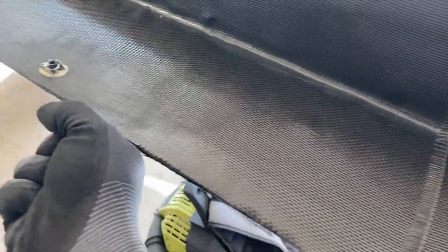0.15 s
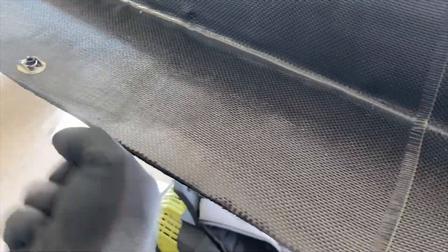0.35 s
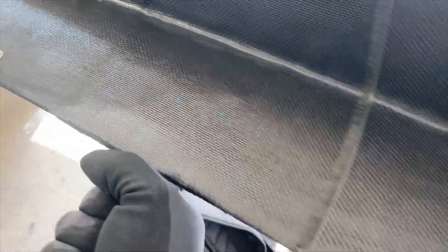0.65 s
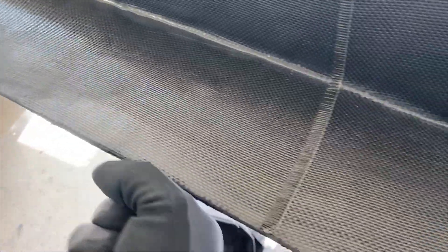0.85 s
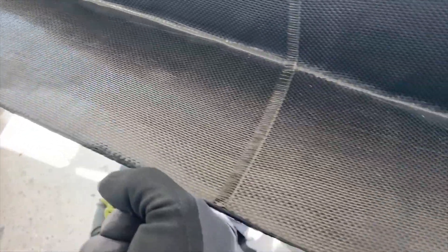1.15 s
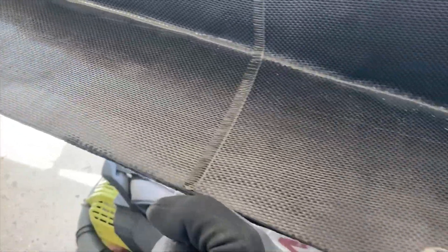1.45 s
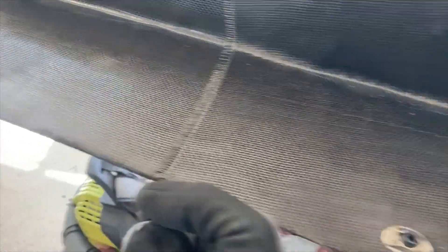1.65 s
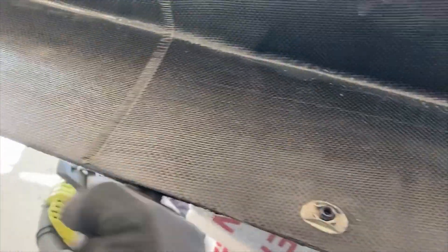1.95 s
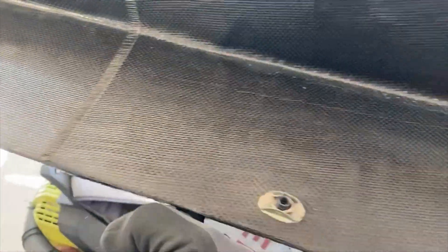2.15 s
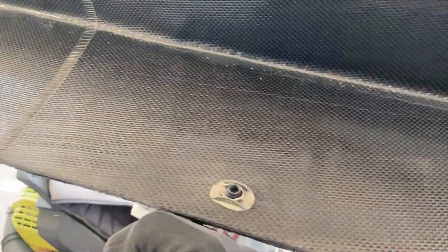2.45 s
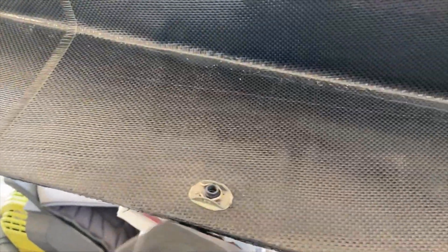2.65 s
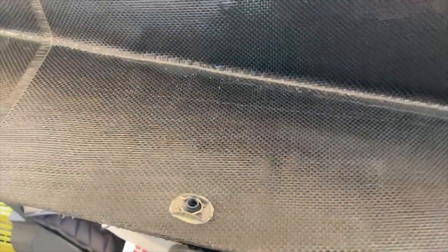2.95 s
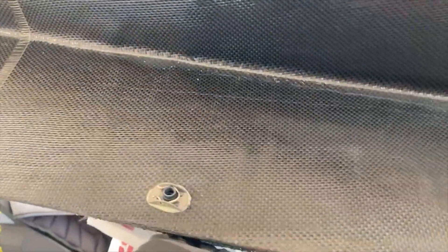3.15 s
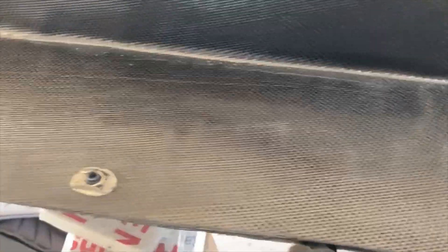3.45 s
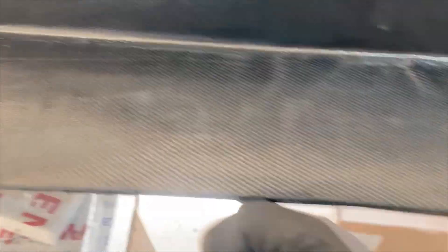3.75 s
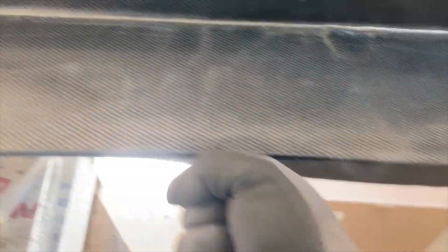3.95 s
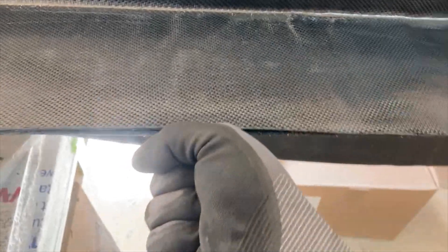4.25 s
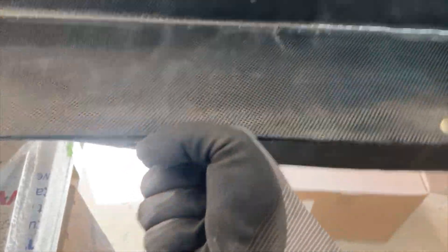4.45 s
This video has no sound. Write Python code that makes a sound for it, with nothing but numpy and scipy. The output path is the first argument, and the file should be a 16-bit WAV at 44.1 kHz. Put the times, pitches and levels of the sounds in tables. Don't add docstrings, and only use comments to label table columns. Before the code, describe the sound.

Close to the microphone, a bonded composite laminate parts in uneven bursts: dry bright snaps with woody knocks, thin fibre ticks, brief plate ringing and a low bending groan under each heavy pull. Quiet gaps between pulls expose a faint room hum. The densest, loudest crackling comes around two thirds through, in a mildly reverberant workshop.

```python
import sys
import numpy as np
from scipy import signal
from scipy.fft import rfft, irfft, next_fast_len
from scipy.io import wavfile

SR = 44100
rng = np.random.default_rng(int(sys.argv[2]) if len(sys.argv) > 2 else 0)


def unload_audio(sound):
    columns = np.transpose(np.atleast_2d(sound))
    steps = np.round(np.clip(columns, -1, 1) * 32767)
    wavfile.write(sys.argv[1], SR, steps.astype(np.int16))


def magnitude_from_level(level_db):
    exponent = np.asarray(level_db, float) / 20
    return 10 ** exponent


N = 202181

# [f/Hz, width/Hz, level/dB]
SNAP_MODES = [(8550, 2770, 1.5), (10010, 1600, -1), (12000, 2700, -4.5), (15400, 670, -18.5)]
# [f/Hz, width/Hz, level/dB]
KNOCK_MODES = [(2925, 278, -9.5), (3800, 1320, -1.5), (4770, 5600, -36), (6020, 710, -3)]
# [f/Hz, width/Hz, level/dB]
PLATE_MODES = [(477.5, 60.5, -6), (631, 84, -16.5), (735, 65, -12.5), (885, 56, -9), (1095, 233, -3),
               (1630, 266, 1.5), (1940, 200, -3), (2750, 520, -1)]
# [f/Hz, width/Hz, level/dB]
RIM_MODES = [(1282.7, 61.4, -3.5), (1394, 200, -5.5)]
# [t/s, snap peak level/dB, then knock, plate ring, rim note: dB re snap]
LONE_CRACKS = [(0.3642, -25.5, -17, 1, -5.5), (0.4186, -21, -3.5, -7, -38), (0.494, -15, -2.5, -1.5, -6),
               (0.6278, -28, -2.5, -6, -8), (0.7446, -22, -5.5, -4.5, -5.5), (0.8334, -14, -0.5, 2.5, -15),
               (1.236, -17.5, 0, -2, -13.5), (1.4254, -16.5, -4.5, -10.5, -8.5),
               (1.436, -17, -31, -4.5, -12), (2.293, -14.5, 5, -5, 4), (2.759, -8.5, -12, -5.5, -17.5),
               (2.7617, -8, -10, -4, -12), (2.909, -11.5, -26, -6, -23), (2.9117, -12, -4, -12, -44),
               (3.9128, -25.5, -13, -8, 7), (4.0136, -17.5, -14, -15, -17.5),
               (4.4208, -12.5, -6.5, -14.5, -12.5)]
# [full tear t/s, hold/s, tearing level/dB, depth/dB (heavy pulls creak low), rim rub/dB re tear]
HAND_PULLS = [(0.01, 0.049, -36, -8, -12), (0.239, 0.24, -35.5, -2, -34), (0.52, 0.15, -41, -1.5, -14),
              (0.738, 0.0081, -31, -0.5, -2), (0.887, 0.021, -35.5, -3.7, -13),
              (1.001, 0.05, -38.5, 1.2, 2), (1.112, 0.18, -43, -7, 2), (1.268, 0.047, -37, -1.5, 3),
              (1.96, 0.043, -29.5, -2.5, 2), (2.056, 0.024, -60, 22.5, -9), (2.244, 0.019, -45, 7, -15),
              (2.31, 0.041, -38, 8.5, -21), (2.499, 0.17, -52, 3.5, -15), (2.625, 0.03, -43, -4.5, -14),
              (2.666, 0.033, -31, 4.5, -2), (3.217, 0.13, -25, -2.5, 3.5), (3.619, 0.043, -32.5, 7.8, -2),
              (3.884, 0.029, -31.5, 6.5, -3), (4.03, 0.03, -52.5, 13, 3), (4.143, 0.146, -49, 0.5, -9),
              (4.318, 0.083, -46.5, 2.5, -1)]


def cracks():
    # [t/s, snap peak level/dB]
    crack_runs = [(0.0325, -25), (0.052, -27.5), (0.3519, -27.5), (0.412, -26), (0.8687, -25),
                  (1.0196, -40), (1.0435, -38), (1.0513, -30), (1.061, -32), (1.9841, -28), (2.0026, -20),
                  (2.0121, -14), (2.0662, -28), (2.367, -33), (2.4836, -30.5), (2.9614, -28), (3.2421, -32),
                  (3.32, -12.5), (3.3475, -28), (3.3277, -7.5), (3.3408, -11.5), (3.3612, -6.5),
                  (3.3685, -12.5), (3.3987, -12.5), (3.6474, -15), (3.6598, -11.5), (3.6712, -16),
                  (3.9456, -31.5)]
    # [t/s, snap peak level/dB]
    fibre_ticks = [(0.075, -46), (0.241, -34), (0.2527, -31.5), (0.7632, -32), (1.9309, -38), (1.9414, -34),
                   (1.9913, -25), (2.1525, -46), (2.343, -27), (2.64, -43), (2.6464, -45), (2.651, -40),
                   (2.6915, -30), (2.7097, -27), (2.7262, -26), (2.7347, -28), (2.7495, -33),
                   (3.0906, -31.5), (3.1034, -28.5), (3.2094, -30), (3.2185, -32), (3.225, -35),
                   (3.2348, -21.5), (3.2847, -28), (3.4876, -34), (3.9941, -37), (3.9992, -30),
                   (4.036, -43), (4.553, -40.5)]
    # [t/s, snap peak level/dB]
    flange_slips = [(0.1076, -52.5), (0.6505, -49), (0.9903, -40), (1.1172, -54.5), (1.9537, -36),
                    (1.9786, -38), (2.2445, -47), (2.2846, -41.5), (2.6626, -53), (2.7002, -42),
                    (3.1919, -70), (3.201, -60), (3.6278, -38), (3.8846, -36.5), (3.8913, -55)]
    # knock, plate ring, rim note (dB re snap)
    kinds = [(crack_runs, (-3.5, -22, -13.5)),
             (fibre_ticks, (-14.5, -19.5, -46)),
             (flange_slips, (0, 1.5, 8))]
    events = list(LONE_CRACKS)
    for rows, colour in kinds:
        events += [(*row, *colour) for row in rows]
    s, snap_db, knock_db, ring_db, rim_db = np.transpose(events)
    at = np.round(s * SR).astype(int)
    dulling = -.6 * np.clip(knock_db + 4, -15, 8)
    snap = strike(at, snap_db + 5.5, SNAP_MODES, rise_s=.0005, tear_s=.001, spread_db=1.2, tilt_db=dulling)
    knock = strike(at, snap_db + knock_db + 2.5, KNOCK_MODES, rise_s=.0005, tear_s=.0014, spread_db=2.5)
    ring = strike(at + 20, snap_db + ring_db - 7.5, PLATE_MODES, rise_s=.000079, tear_s=.0025, spread_db=.5)
    rim = strike(at + 30, snap_db + rim_db + 1, RIM_MODES, rise_s=.001, tear_s=.0033, spread_db=2.5)
    return pair(snap, .3) + pair(knock, .6) + pair(ring, .5) + pair(rim, .15)


def strike(at, level_db, modes, rise_s, tear_s, spread_db, tilt_db=0):
    length, lead = 640, 128
    t = (np.arange(length) - lead) / SR
    shape = np.where(t < 0, np.exp(t / rise_s), np.exp(-t / tear_s) + .22 * np.exp(-t / .0075))
    shape += 1.2 * np.exp(-np.abs(t) / .00015)
    bins_hz = np.fft.rfftfreq(length, 1 / SR)
    place = at[:, None] + np.arange(length) - lead
    out = np.zeros((2, N))
    for hz, width, mode_db in modes:
        tear = rng.standard_normal((len(at), 2, length)) * shape
        near = 1 / (1 + (2 * (bins_hz - hz) / (width + 70)) ** 2)
        felt = (np.abs(rfft(tear)) ** 2 * near).sum(axis=2, keepdims=True) / near.sum()
        chance_db = spread_db * rng.standard_normal(len(at))
        gain_db = level_db + mode_db + tilt_db * np.log2(hz / modes[1][0]) + chance_db
        tear *= magnitude_from_level(gain_db)[:, None, None] / np.sqrt(felt)
        force = np.zeros((2, N))
        np.add.at(force, (slice(None), place), tear.transpose(1, 0, 2))
        out += resonate(force, hz, width)
    return out


def peel():
    # [f/Hz, width/Hz, level/dB]
    deep_modes = [(218.3, 105.4, 1.5), (316, 64.3, -2.5), (379, 87, -1)]
    _, snap_db, knock_db, ring_db, rim_db = np.transpose(LONE_CRACKS)
    *_, depth_db, rub_db = np.transpose(HAND_PULLS)

    crackle = tearing(-depth_db, 187, -69, snap_db - 22.5 + .59 * knock_db)
    creak = tearing(0, 116.5, -57, snap_db - 18.5 + .27 * ring_db)
    rub = tearing(rub_db, 160.5, -89, snap_db + rim_db - 33)
    deep = tearing(depth_db, 160.5, -65.5, snap_db - 36)

    fine = grains(2500, size_db=3.5)
    bright = rms_one(body(fine, SNAP_MODES) + magnitude_from_level(-8.5) * body(fine, KNOCK_MODES))
    plate = rms_one(body(grains(800, size_db=3.5), PLATE_MODES))
    rim = rms_one(body(grains(1500, size_db=3), RIM_MODES))
    low = rms_one(body(grains(300, size_db=3.5), deep_modes))
    return (magnitude_from_level(-10.5) * crackle * pair(bright, .46)
            + magnitude_from_level(-8.5) * creak * pair(plate, .78)
            + magnitude_from_level(-9) * rub * pair(rim, .17)
            + magnitude_from_level(-6) * deep * pair(low, .068))


def tearing(lean_db, fade_db_per_s, rest_db, fray_db):
    s, hold, db = np.transpose(HAND_PULLS)[:3]
    pulled = swells(s, db + lean_db, 800, fade_db_per_s, rest_db, hold, swell_db=3.5)
    frayed = swells(np.transpose(LONE_CRACKS)[0] + .008, fray_db, 2000, 109, -120)
    return np.sqrt(magnitude_from_level(pulled) ** 2 + magnitude_from_level(frayed) ** 2)


def grains(per_s, size_db):
    sizes = magnitude_from_level(size_db * np.minimum(rng.exponential(1, (2, N)), 4))
    signs = rng.choice([-1, 1], (2, N))
    breaks = rng.random((2, N)) < per_s * magnitude_from_level(4 * drift(25)) / SR
    return sizes * signs * breaks


def flex():
    # [onset t/s, pitch f/Hz, groan level/dB, hold/s]
    shell_swings = [(0.01, 162.2, -46, 0.098), (0.365, 167.6, -31, 0.013), (0.407, 154.7, -31, 0.032),
                    (0.508, 162.8, -38, 0.057), (0.638, 138.8, -34, 0.027), (0.739, 150.6, -36.5, 0.032),
                    (0.84, 139.7, -31.5, 0.042), (0.91, 141.8, -41, 0.017), (1.018, 132.8, -33.5, 0.054),
                    (1.11, 125.2, -39, 0.03), (1.191, 132.8, -31.5, 0.055), (1.278, 150, -28.5, 0.027),
                    (1.359, 148.4, -36, 0.014), (1.42, 159, -43, 0.008), (1.968, 147.6, -25, 0.024),
                    (2.046, 141.8, -23, 0.04), (2.15, 157.4, -45, 0.13), (2.312, 166.4, -30, 0.082),
                    (2.465, 174.3, -44.5, 0.042), (2.669, 163.4, -28.5, 0.056), (2.794, 168, -49, 0.02),
                    (2.867, 169, -51, 0.011), (3.215, 129.6, -21.5, 0.057), (3.313, 155.7, -26.5, 0.029),
                    (3.385, 144.8, -29.5, 0.045), (3.496, 155, -38.5, 0.034), (3.643, 140.1, -24, 0.018),
                    (3.666, 136.5, -23, 0.023), (3.901, 150.4, -31.5, 0.028)]
    # [t/s, f/Hz, level/dB]
    joining_tones = [
        [(2.62, 126.4, -55), (2.676, 137, -69), (2.714, 114, -21.5), (2.82, 127, -80)],
        [(3.61, 424.5, -43), (3.66, 412, -29.5), (3.71, 415, -52)],
    ]
    s, swing_hz, peak_db, hold = np.transpose(shell_swings)
    hz = np.interp(np.arange(N) / SR, s + hold / 2, swing_hz)
    groan_db = swells(s, peak_db, 1118, 451, -67.5, hold, swell_db=1)
    phase = 2 * np.pi * np.cumsum(hz * (1 + .057 * drift(44.6))) / SR
    swing = np.sin(phase) + magnitude_from_level(-21.5) * np.sin(2 * phase + 1) + magnitude_from_level(-21.5) * np.sin(3 * phase)
    groan = magnitude_from_level(-12) * rms_one(band(rng.standard_normal((2, N)), 100, 220))
    groan[0] += np.sqrt(2) * swing * magnitude_from_level(1.2 * drift(15))
    return magnitude_from_level(groan_db) * pair(groan, .83) + sum(map(joining, joining_tones))


def joining(rows):
    first, last = rows[0], rows[-1]
    hz, level_db = in_time([(first[0] - .03, first[1], -90), *rows, (last[0] + .03, last[1], -90)])
    return np.sqrt(2) * magnitude_from_level(level_db) * np.sin(2 * np.pi * np.cumsum(hz) / SR)


def grip():
    # [t/s, level/dB]
    grip_levels = [(0.0, -53), (0.06, -48), (0.41, -40.5), (0.51, -52.5), (1.42, -53.5), (1.82, -64.5),
                   (2.03, -49), (2.17, -58.5), (2.35, -42), (2.56, -61), (2.7, -40.5), (2.83, -60.5),
                   (3.11, -63.5), (3.2, -56), (3.49, -58), (3.99, -36.5), (4.21, -65.5), (4.58, -56.5)]
    level_db, = in_time(grip_levels)
    rumble = rms_one(band(band(rng.standard_normal((2, N)), 36, 105), 30, 115))
    return magnitude_from_level(level_db + 1.5) * pair(rumble, .22)


def ports(x):
    # [f/Hz, left leads by/rad]
    phase_lead = [(0, 0), (1210, -0.8), (1640, -3.6), (2930, -8.7), (7150, -1.6), (8530, 0.7), (9390, 2.8),
                  (10200, 3.9), (11800, 7.0), (12700, 9.1), (13400, 9.7), (14500, 12.4), (16100, 14.2),
                  (16500, 12.8)]
    # [f/Hz, left over right/dB]
    level_tilt = [(60, 1), (110, 0.5), (200, -2.5), (380, 1.5), (700, -5), (1290, -1), (2380, 0.5),
                  (4400, 1.5), (8120, 0.0), (15000, -0.5)]
    size = next_fast_len(N + 4096)
    hz = np.arange(size // 2 + 1) * SR / size
    gain = magnitude_from_level(np.interp(hz, *np.transpose(level_tilt)) / 2)
    half = gain * np.exp(.5j * np.interp(hz, *np.transpose(phase_lead)))
    return irfft(rfft(x, size) * np.array([half, 1 / half]), size)[:, :N]


def workshop(x):
    # [f/Hz, t60/s, level/dB]
    tail_bands = [(150, 0.23, -18.5), (425, 0.32, -38), (860, 0.23, -36), (2500, 0.33, -36.5),
                  (4620, 0.41, -37.5), (8770, 0.44, -49), (13100, 0.45, -52.5)]
    t = np.arange(SR) / SR
    white = rng.standard_normal((2, 2, SR))
    tail = np.zeros((2, SR))
    for k, (hz, t60, db) in enumerate(tail_bands):
        tail += magnitude_from_level(db - 60 * t / t60) * band(white[k % 2], hz / 1.63, hz * 1.327)
    tail = pair(tail, .3) * (1 - np.exp(-t / .002))
    return signal.fftconvolve(x, tail, axes=1)[:, :N]


def room_floor():
    # [f/Hz, level/dB per Hz]
    floor_curve = [(18, -39), (30, -71.5), (121, 10.5), (259, -8), (461, 13), (666, -16.5), (2010, -6),
                   (3580, -12), (11100, -24.5), (16000, -46)]
    edges = 30 * 2 ** np.arange(0, 9.6, .5)
    white = rng.standard_normal((2, 2, N))
    hz, db = np.transpose(floor_curve)
    level_db = np.interp(np.log(edges * 2 ** .25), np.log(hz), db)
    noise = np.zeros((2, N))
    for k in range(len(edges) - 1):
        noise += magnitude_from_level(level_db[k]) * band(white[k % 2], edges[k], edges[k + 1])
    return magnitude_from_level(-61.5) * rms_one(noise)


def swells(s, peak_db, rise, fade, rest_db, hold=0, swell_db=0):
    step = 32
    t = np.arange(0, N + step, step)[:, None] / SR - s
    hold = np.maximum(hold, 1e-4)
    growth = swell_db * (np.clip(t / hold, 0, 1) - 1)
    db = peak_db + growth + rise * np.minimum(t, 0) - fade * np.maximum(t - hold, 0)
    total = 10 * np.log10((magnitude_from_level(db) ** 2).sum(axis=1) + magnitude_from_level(rest_db) ** 2)
    return np.interp(np.arange(N) / step, np.arange(len(total)), total)


def body(force, modes):
    return sum(magnitude_from_level(db) * resonate(force, hz, width) * (-1) ** k for k, (hz, width, db) in enumerate(modes))


def resonate(x, hz, width):
    r, w = np.exp(-np.pi * width / SR), 2 * np.pi * hz / SR
    return signal.lfilter([.5, 0, -.5], [1, -2 * r * np.cos(w), r * r], x + 1e-18) * 2


def pair(two, unlike):
    return np.array([two[0] + unlike * two[1], two[0] - unlike * two[1]])


def drift(rate):
    r = np.exp(-2 * np.pi * rate / SR)
    slow = signal.lfilter([1], [1, -2 * r, r * r], rng.standard_normal(N + SR))
    return rms_one(slow[SR:])


def band(x, low_hz, high_hz):
    return signal.sosfilt(signal.butter(2, [low_hz, min(high_hz, .45 * SR)], "band", fs=SR, output="sos"), x)


def rms_one(x):
    return x / np.sqrt(np.mean(x ** 2) + 1e-20)


def in_time(rows):
    s, *columns = np.transpose(rows)
    return [np.interp(np.arange(N) / SR, s, c) for c in columns]


def scene():
    bond = cracks() + peel()
    return ports(bond + workshop(bond) + flex() + grip()) + room_floor()


def band_limit(x):
    return signal.sosfilt(signal.butter(12, 16970, fs=SR, output="sos"), x)


def record(dry):
    soft = .9 * np.tanh(dry / .9)
    cut = signal.sosfilt(signal.butter(2, 40, "high", fs=SR, output="sos"), soft)
    cut = signal.sosfilt(signal.cheby2(10, 60, 16900, fs=SR, output="sos"), cut)
    return band_limit(cut)


dry = scene()
out = record(dry)
unload_audio(out)
```